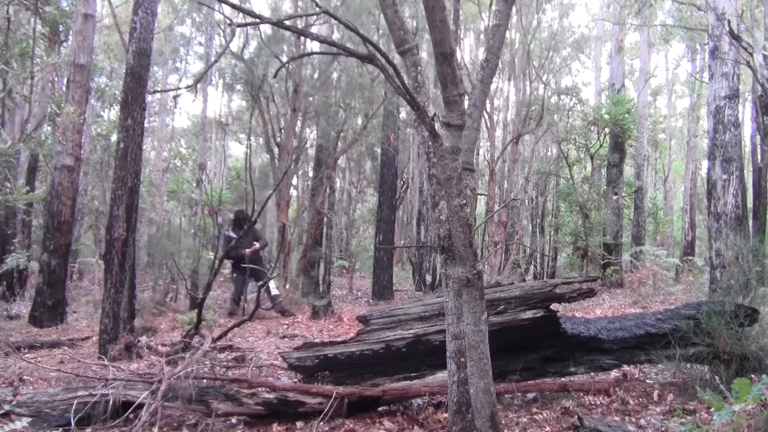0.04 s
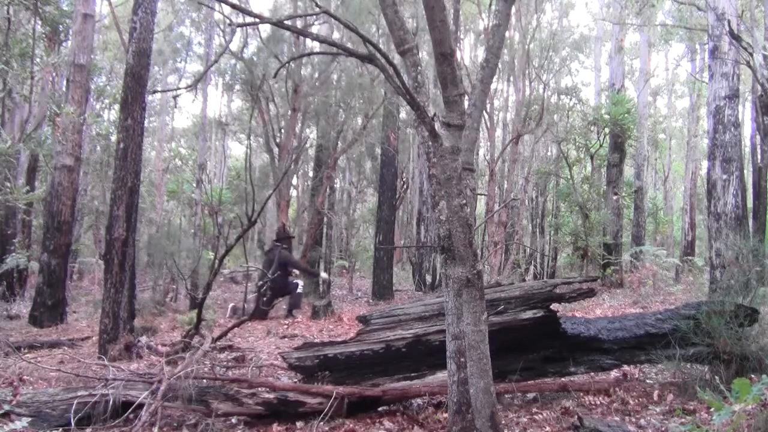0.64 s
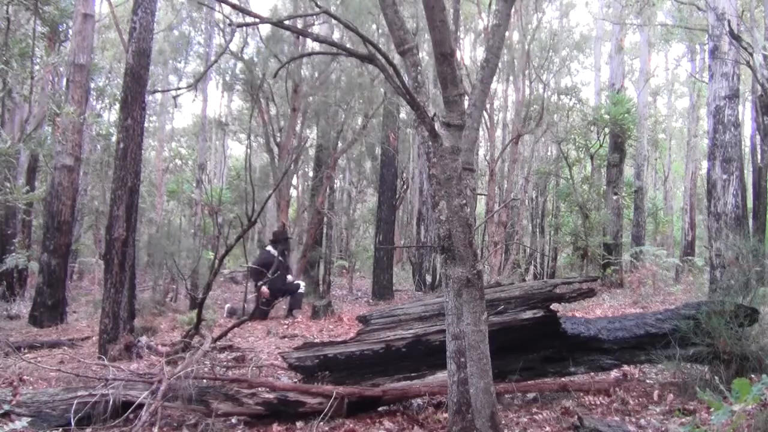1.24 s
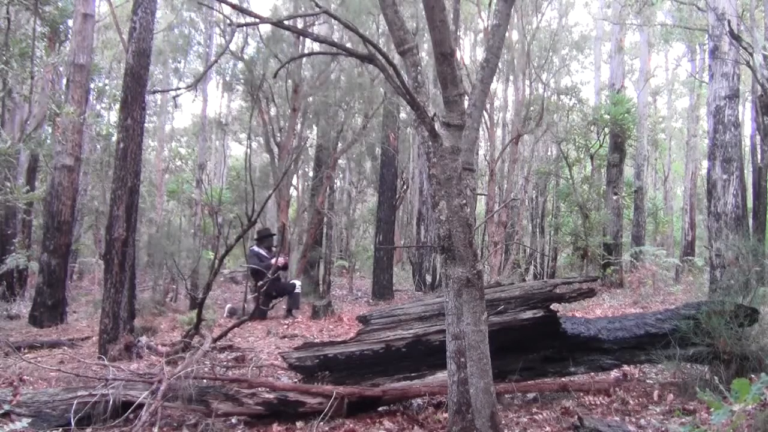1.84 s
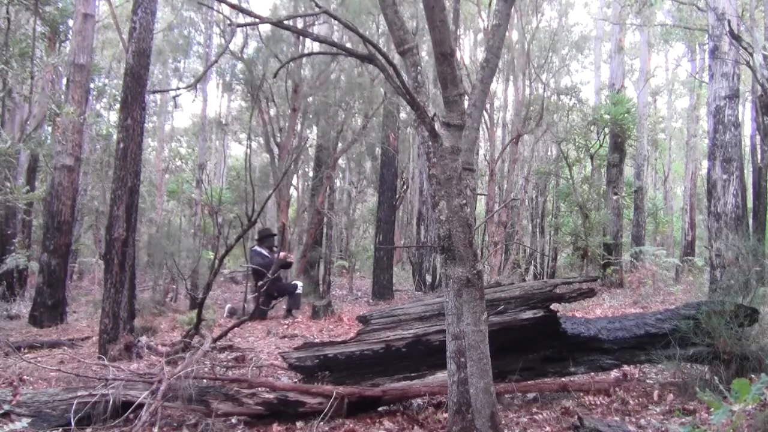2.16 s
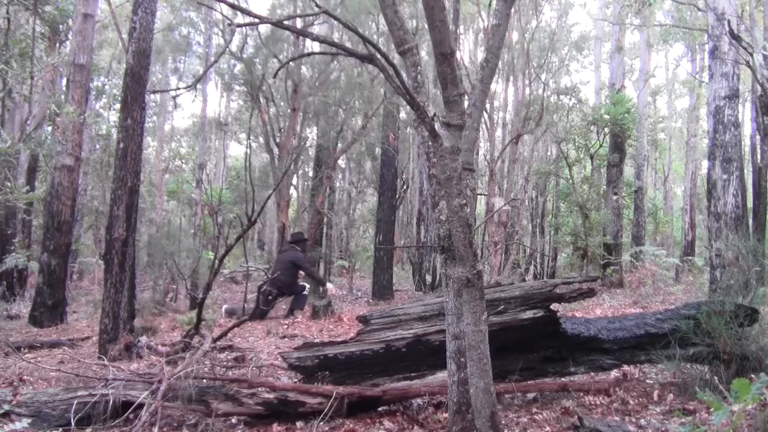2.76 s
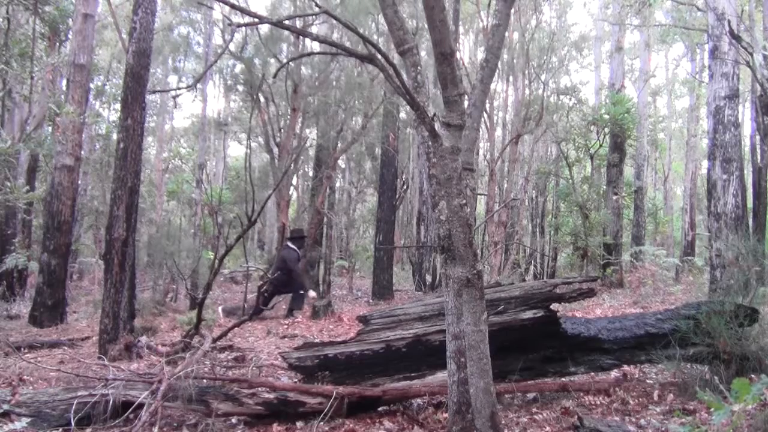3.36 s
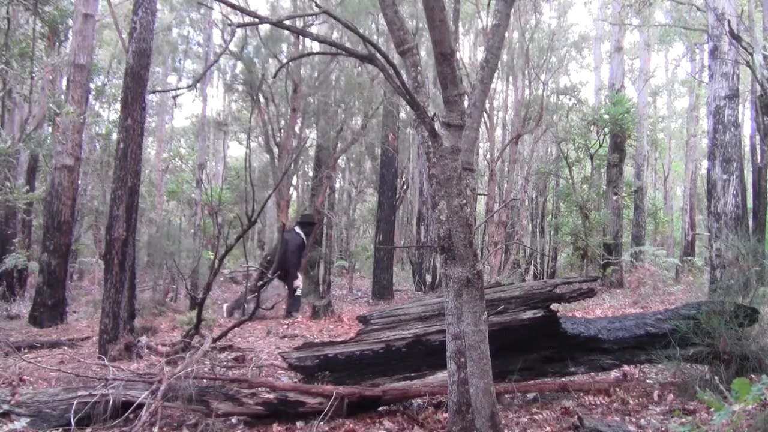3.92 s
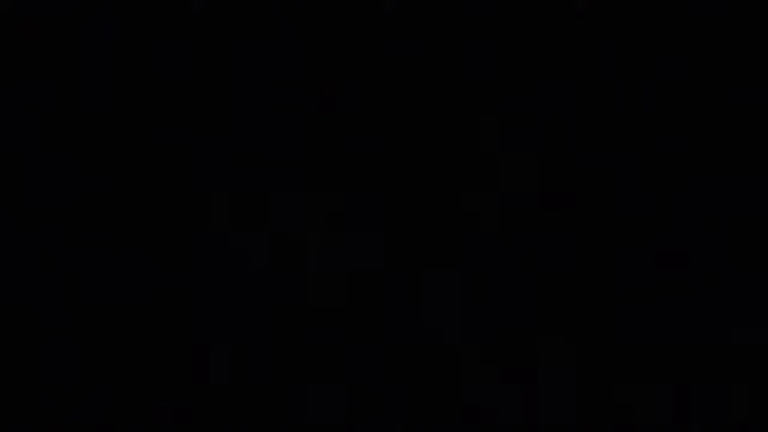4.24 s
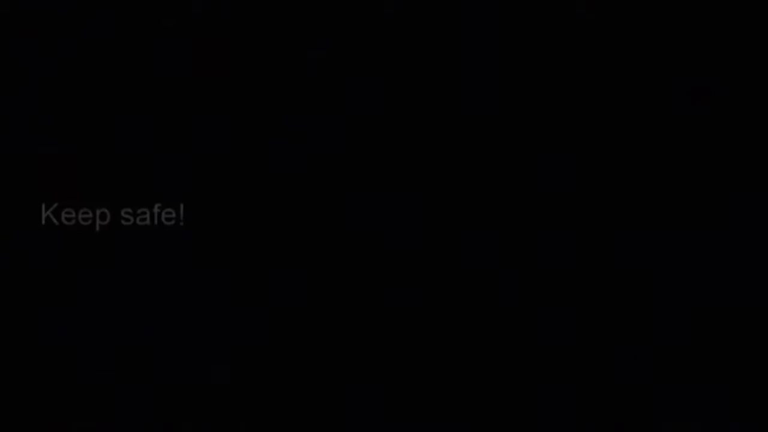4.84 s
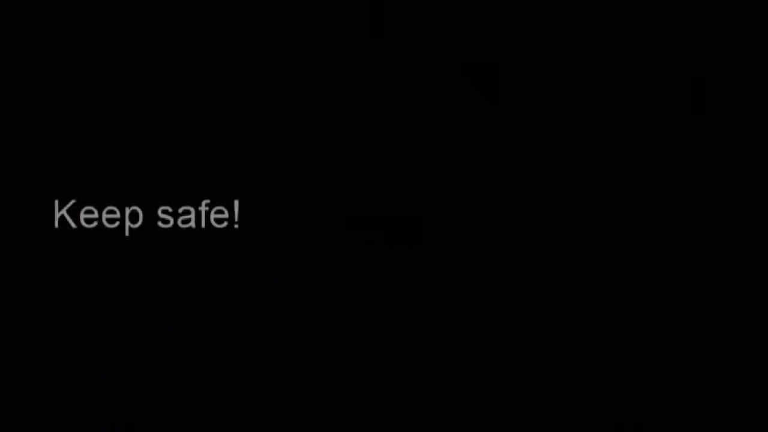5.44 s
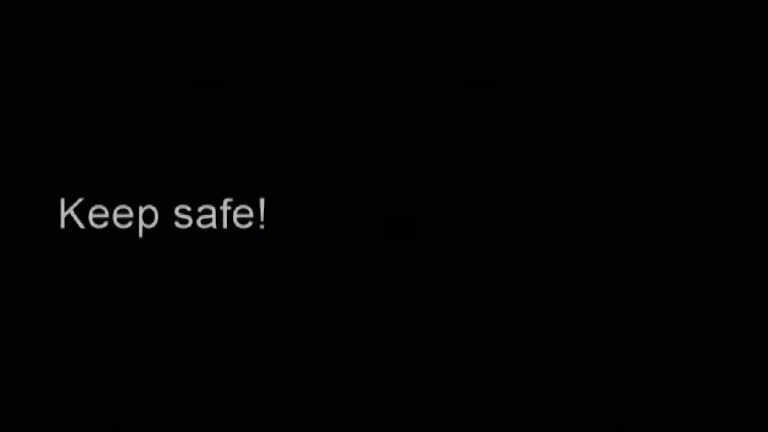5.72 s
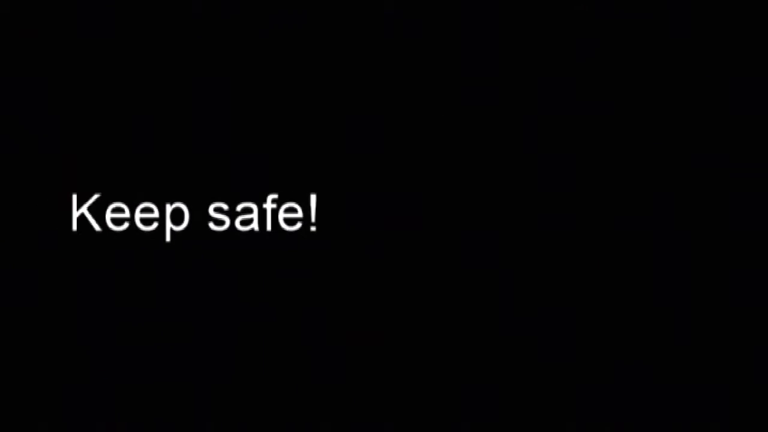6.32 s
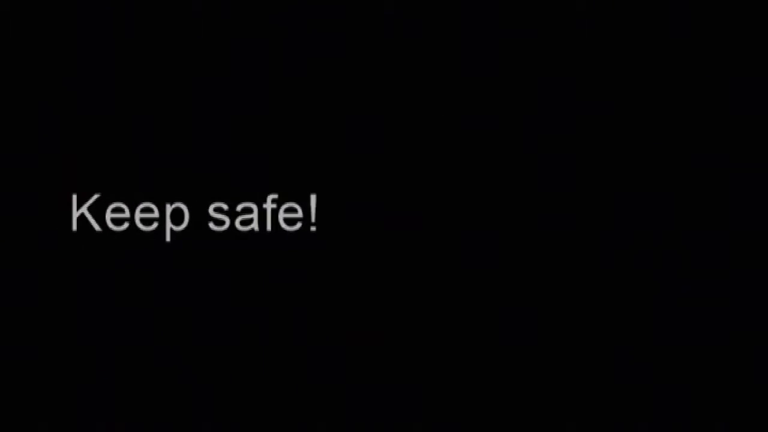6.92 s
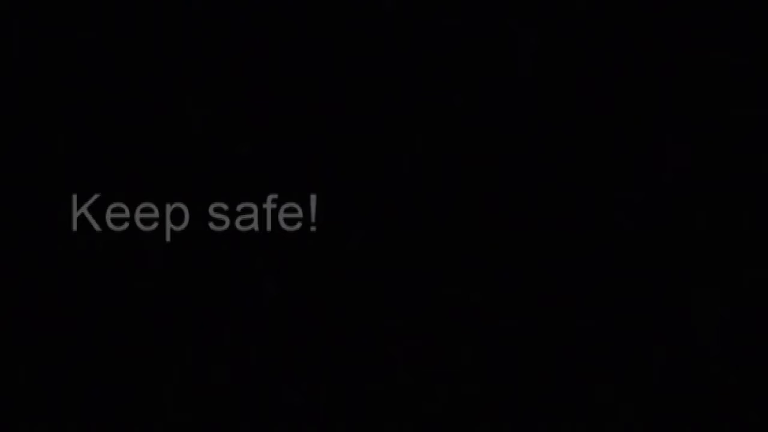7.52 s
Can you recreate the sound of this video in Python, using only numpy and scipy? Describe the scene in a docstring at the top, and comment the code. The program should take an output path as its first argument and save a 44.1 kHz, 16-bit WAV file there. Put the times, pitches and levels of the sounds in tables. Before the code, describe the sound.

Wind hisses through treetops as two knives strike wood with short, dry knocks, followed by faint indoor hum and tiny ticking.

```python
"""In a forest, wind hisses steadily in the crowns. Some way from the microphone a thrown knife bites into
a trunk: the bark splits, wood and blade ring in a short dry knock, and the other trunks scatter it faintly.
The next knife is drawn, steel over steel, with a faint scrape and a few light ticks, and lands in turn.
Then the scene cuts to a very quiet room with a faint hum, a tiny regular ticking and a few soft bumps."""
import sys
import numpy as np
from scipy import signal
from scipy.fft import rfft, irfft
from scipy.io import wavfile

SR = 44100
rng = np.random.default_rng(int(sys.argv[2]) if len(sys.argv) > 2 else 0)


def bounce(signal):
    """Save signal as a 16-bit WAV file at the path given by the first command-line argument."""
    frames = np.transpose(np.atleast_2d(signal))
    limited = np.clip(frames, -1, 1)
    pcm = np.round(limited * 32767).astype(np.int16)
    wavfile.write(sys.argv[1], SR, pcm)


N = 338688
T = np.arange(N) / SR

# knives landing: t/s, time to sink in/s, blow/dB, wood pitch ratio, blade pitch ratio, blade/dB,
# entry rasp at full depth/dB, first touch relative to that/dB, top of the rasp/Hz,
# bark at the stop/dB, grating/dB, dull wash/dB
THROWS = [(1.1706, .0049, -35.3, 0.972, 0.997, -30.5, -35.5, -0.5, 14000, -37, -47, -42.5),
          (3.2336, .0041, -30.7, 1.02, 1.34, -29.5, -27, -9, 5500, -36, -38, -44)]


def from_db(db):
    """Decibels to gain."""
    return 10 ** (np.asarray(db) / 20)


def rms_one(x):
    """Scale to an rms of one."""
    return x / np.sqrt(np.mean(x ** 2) + 1e-20)


def colour(x, spectrum):
    """Give a signal a spectrum drawn on a log-frequency axis; rms 1."""
    hz, db = np.transpose(spectrum)
    bins = np.maximum(np.arange(N // 2 + 1) * SR / N, 1)
    gain = from_db(np.interp(np.log(bins), np.log(hz), db))
    return rms_one(irfft(rfft(x) * gain, N))


def noise(spectrum):
    """Coloured noise; rms 1."""
    return colour(rng.standard_normal(N), spectrum)


def crackle(per_s):
    """Random tiny snaps of uneven size."""
    return rng.standard_normal(N) * (rng.random(N) < per_s / SR)


def drift(per_s):
    """Random wandering; rms 1."""
    return rms_one(np.interp(T * per_s, np.arange(N), rng.standard_normal(N)))


def ring(x, hz, t60):
    """A resonance: a unit click sets off a dying sine of height 1."""
    r, w = from_db(-60 / (t60 * SR)), 2 * np.pi * hz / SR
    return signal.lfilter([0, np.sin(w)], [1, -2 * r * np.cos(w), r * r], x + 1e-18)


def band(x, low_hz, high_hz, order):
    """Causal band-pass."""
    return signal.sosfilt(signal.butter(order, [low_hz, high_hz], "band", fs=SR, output="sos"), x)


def swell(s, half_s):
    """A bell-shaped rise and fall around a moment."""
    return np.exp(-.5 * ((T - s) / half_s) ** 2)


def stereo(mid, side, pan_db):
    """Left and right from middle and side, leaning by a level difference."""
    return np.array([(mid + side) * from_db(pan_db / 2), (mid - side) * from_db(-pan_db / 2)])


def knives_landing(bite_s=.0027, settle_s=.0008, wedge_s=.0023, contact_hz=5000):
    """The tip splits the bark for a few ms, stops dead and wedges fast: trunk and blade ring briefly."""
    # trunk modes, their strength set by where the knife lands:
    # f/Hz, t60/s, level in the first throw/dB, level in the second/dB
    trunk_modes = [(700, .028, -17, -2), (820, .034, 2, 1), (945, .032, -7, -7), (1450, 0.037, -4, -1),
                   (1970, 0.038, -16, -3), (2660, 0.03, 4.5, 1.5), (2960, 0.017, -12, 5.5),
                   (3100, .024, 2, -2.5), (3550, 0.014, -1, -9), (4280, 0.013, -7, -5)]
    # modes of a blade stuck in the wood: f/Hz, level/dB, t60/s
    blade_modes = [(1820, 0.5, 0.03), (2180, 5.5, 0.0041), (3430, -12, 0.012), (6460, -1.5, 0.012),
                   (7000, -10, 0.0088)]
    # spectrum of bark fibres splitting: f/Hz, level/dB
    bark_spectrum = [(300, -16), (900, -5), (2000, 1), (3000, 3), (5200, -3), (7500, -0.5), (10000, -6),
                     (13000, -24), (16000, -54)]
    wood, steel, bark = np.zeros((3, N))
    for k, (s, entry_s, blow_db, wood_pitch, blade_pitch, blade_db,
            entry_db, touch_db, entry_hz, stop_db, grate_db, _) in enumerate(THROWS):
        blow = np.zeros(N)
        blow[round(s * SR)] = -1
        modes = [from_db(blow_db + dbs[k]) * ring(blow, hz * wood_pitch, t60)
                 for hz, t60, *dbs in trunk_modes]
        # the strongest low mode starts against its neighbours: the hollow knock swells after the crack
        wood += modes[0] - modes[1] + sum(modes[2:])
        # the deeper the blade sticks, the shorter its free part and the higher it rings
        steel += sum(from_db(blade_db + db) * ring(blow, hz * blade_pitch, t60)
                     for hz, db, t60 in blade_modes)
        # hard bark parts with a bright rasp, soft bark with a duller crunch that grows as the tip sinks
        fibres = colour(crackle(per_s=22000), bark_spectrum)
        to_go = np.clip((s - T) / entry_s, 0, 1)
        entering = (T > s - entry_s) * (T < s) * from_db(touch_db * to_go) * fibres
        bark += from_db(entry_db) * signal.sosfilt(signal.butter(2, entry_hz, fs=SR, output="sos"), entering)
        bite = (T >= s) * np.exp(-np.maximum(T - s - bite_s, 0) / settle_s)
        bark += from_db(stop_db) * bite * fibres
        # the blade grates as it wedges, just after the stop
        grating = rms_one(band(rng.standard_normal(N), 8200, 10800, order=3))
        bark += from_db(grate_db) * swell(s + wedge_s, half_s=.0006) * grating
    # wood yields, which dulls its knock
    wood = signal.sosfilt(signal.butter(1, contact_hz, fs=SR, output="sos"), wood)
    # so small a spot radiates no bass, and the distance to the microphone takes the top
    return band(wood + steel, 560, 10500, order=3) + bark


def trunk_wash(t60=.2):
    """Each blow spreads through the trunk and dies away without a pitch."""
    # spectrum of the trunk's countless weak modes, merged: f/Hz, level/dB
    wash_spectrum = [(100, -20), (400, -13), (850, 5), (1200, -11), (1550, -3), (2300, -4), (3500, -9),
                     (7000, -14), (10000, -13), (13000, -45)]
    dying = sum((T > s) * from_db(db - 60 * np.maximum(T - s, 0) / t60) for s, *_, db in THROWS)
    return dying * noise(wash_spectrum)


def knife_drawn(at_s=1.791, level_db=-46, rise_s=.022, hold_s=.015, release_s=.0087, catch_db=2):
    """Steel slips over steel: a dense run of tiny catches rings the hand-damped blade."""
    # modes of steel held in the hand: f/Hz, level/dB, t60/s
    held_modes = [(1920, -3, 0.012), (3080, -5, .011), (4090, -2, 0.013), (4380, -2.5, .015),
                  (5840, -6, .012), (7900, -5.5, .009), (8660, -5, 0.0045), (10600, -11, 0.0037)]
    slips = crackle(per_s=5000)
    steel = sum((-1) ** k * from_db(db) * ring(slips, hz, t60)
                for k, (hz, db, t60) in enumerate(held_modes))
    # one stroke: the grip builds, holds, and the tip slips free
    stroke = np.exp(np.minimum(T - at_s, 0) / rise_s - np.maximum(T - at_s - hold_s, 0) / release_s)
    pressure = from_db(level_db + catch_db * drift(per_s=150)) * stroke
    return pressure * rms_one(steel)


def knives_touching():
    """Blades brush each other in the hand with short bright ticks."""
    # light touches: t/s, level/dB
    touches = [(1.753, -52), (1.7925, -45), (1.8035, -47), (1.844, -48), (2.872, -47)]
    # spectrum of a touch of steel: f/Hz, level/dB
    touch_spectrum = [(500, -20), (2000, -2), (5000, -2), (8300, 0), (10500, -9), (13000, -33)]
    return sum(from_db(db) * swell(s, half_s=.0014) for s, db in touches) * noise(touch_spectrum)


def forest_echoes(x, near_db=-14.5, far_db=-16, first_echo_s=.011):
    """Near trunks return a quick spray of echoes to the microphone, far ones a faint longer tail."""
    # spectrum scattered by the trunks around: f/Hz, level/dB
    scatter_spectrum = [(200, 1), (800, 5), (2500, -6.5), (6000, -6), (12000, -5.5)]

    def spray(t60, per_s):
        echoes = colour(crackle(per_s), scatter_spectrum) * from_db(-60 * T / t60) * (T > first_echo_s)
        return echoes / np.sqrt(np.sum(echoes ** 2))
    near = from_db(near_db) * spray(t60=.22, per_s=1600)
    far = from_db(far_db) * spray(t60=.98, per_s=4800)
    return signal.fftconvolve(x, (near + far)[:SR])[:N]


def wind(roar_db=-44, hiss_db=-48.5, hiss_db_per_breeze_db=1.65, split_hz=1500):
    """Countless far leaves merge to a smooth roar and hiss, both following the breeze."""
    # spectrum of the wind in the crowns, middle and side: f/Hz, level/dB
    mid_spectrum = [(20, -30), (60, -13), (115, -8), (170, -3), (245, 0.2), (350, -1), (480, -2), (750, -4),
                    (1300, -8), (2200, -12.5), (3200, -13.5), (6000, -19), (8700, -23), (10500, -29.5),
                    (12000, -36), (13500, -62)]
    side_spectrum = [(20, -14), (110, -11.5), (220, -2), (350, 0), (750, -2), (2000, -8), (6000, -12.5),
                     (11500, -18), (12800, -20), (14000, -41)]
    # the breeze freshens a little and stays up: t/s, strength/dB
    breeze = [(0, -.5), (.9, -1), (2, 0.06), (4.2, 0)]
    # soft swells of the roar: t/s, rise/dB
    gusts = [(.37, 0.9), (1.6, 1.5), (2.51, 0.9), (3.08, 1.0), (4.08, 1)]
    air = stereo(noise(mid_spectrum), from_db(-12) * noise(side_spectrum), pan_db=-.66)
    roar = signal.sosfiltfilt(signal.butter(4, split_hz, fs=SR, output="sos"), air)
    hiss = air - roar
    breeze_db = np.interp(T, *np.transpose(breeze))
    gust_db = sum(db * swell(s, half_s=.049) for s, db in gusts)
    roar_gain = from_db(roar_db + breeze_db + gust_db) / np.std(roar.mean(axis=0))
    hiss_gain = from_db(hiss_db + hiss_db_per_breeze_db * breeze_db) / np.std(hiss.mean(axis=0))
    return roar_gain * roar + hiss_gain * hiss


def ticking(first_s=4.348, period_s=.08, uneven_db=.7):
    """A tiny mechanism in the room ticks evenly, a few ticks stronger than the rest."""
    # ticks that stand out: t/s, level above the others/dB
    strong_ticks = [(4.348, 3), (5.466, 7), (6.908, 5.5), (7.388, 4), (7.548, 4)]
    # how firmly it ticks: t/s, level/dB
    tick_force = [(4.3, -69), (5.2, -70), (5.45, -73), (5.7, -73), (6.0, -70.3), (7.6, -70.7)]
    tick = np.round((T - first_s) / period_s)
    accent_db = sum(db * (tick == round((s - first_s) / period_s)) for s, db in strong_ticks)
    force_db = np.interp(T, *np.transpose(tick_force))
    jitter_db = uneven_db * rng.standard_normal(N)[(tick - tick.min()).astype(int)]
    pulses = from_db(force_db + accent_db + jitter_db) * swell(first_s + tick * period_s, half_s=.0036)
    return pulses * rms_one(band(rng.standard_normal(N), 1950, 2880, order=2))


def quiet_room(mid_db=-63.5, side_db=-61, hum_hz=90, hum_db=-75, rumble_hz=160, rumble_db=-78):
    """Room tone all around the microphone: soft hiss, wavering hum, uneven rumble, ticking, dull bumps."""
    # spectrum of the room tone, middle and side: f/Hz, level/dB
    mid_spectrum = [(20, -1.5), (70, -1.5), (120, -3), (178, -0.5), (260, -4.5), (680, -7.5), (820, -5.5),
                    (1050, -8.5), (1500, -12), (2700, -15.5), (6000, -23), (14500, -33)]
    side_spectrum = [(20, -5), (70, -11), (130, -5.5), (230, -2), (370, -0.5), (700, -4.5), (1500, -11),
                     (5000, -23.5), (10000, -31), (14500, -34)]
    # soft bumps: t/s, level/dB, f/Hz
    soft_bumps = [(5.215, -59, 110), (5.342, -60, 350), (6.244, -60, 140), (6.635, -63, 160),
                  (6.95, -60.5, 330), (7.25, -62.5, 160), (7.5, -64, 160)]

    def dull_noise(hz, cycles=2.5):
        return rms_one(ring(rng.standard_normal(N), hz, t60=cycles / hz))
    narrow_noise = ring(rng.standard_normal(N), hum_hz, t60=.22)
    hum = from_db(hum_db) * rms_one(ring(narrow_noise, hum_hz, t60=.22))
    rumble = from_db(rumble_db + 3 * drift(per_s=6)) * dull_noise(rumble_hz)
    bumps = sum(from_db(db) * swell(s, half_s=.012) * dull_noise(hz) for s, db, hz in soft_bumps)
    mid = from_db(mid_db) * noise(mid_spectrum) + hum + rumble + ticking() + bumps
    return stereo(mid, from_db(side_db) * noise(side_spectrum), pan_db=.5)


def scene(cut_s=4.239, echo_side_db=-6):
    """Among the trees until the cut, then indoors."""
    direct = knives_landing() + knife_drawn() + knives_touching()
    # echoes from ahead and from the sides come off different trunks
    ahead, aside = forest_echoes(direct), forest_echoes(direct)
    outdoors = stereo(direct + trunk_wash() + ahead, from_db(echo_side_db) * aside, pan_db=-1) + wind()
    return np.where(T < cut_s, outdoors, quiet_room())


def record(dry, cutoff_hz=15300):
    """A steep low-pass takes off the highest treble."""
    return signal.sosfilt(signal.ellip(10, .1, 80, cutoff_hz, fs=SR, output="sos"), dry)


dry = scene()
out = record(dry)
bounce(out)
```